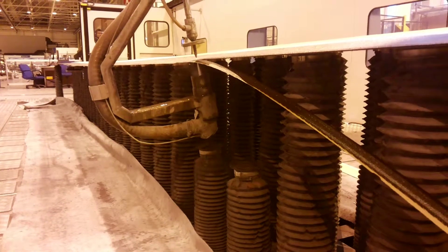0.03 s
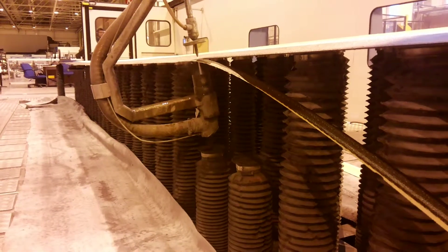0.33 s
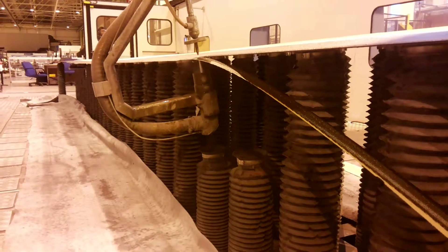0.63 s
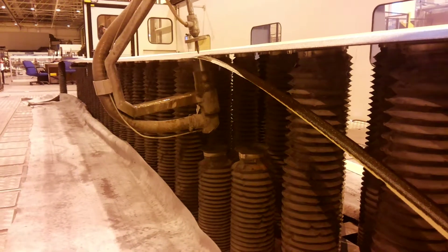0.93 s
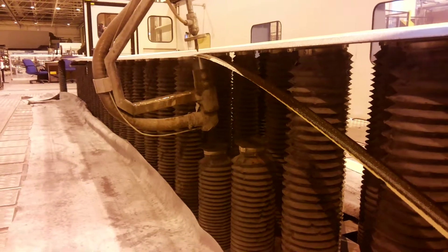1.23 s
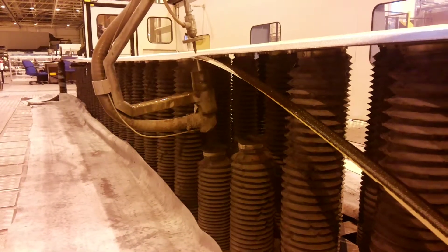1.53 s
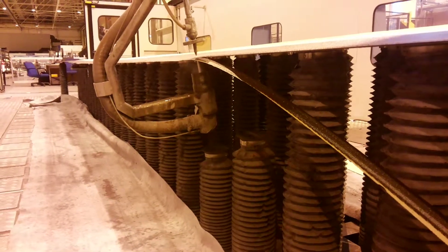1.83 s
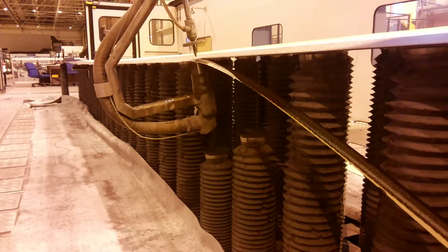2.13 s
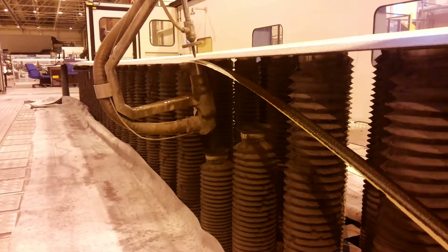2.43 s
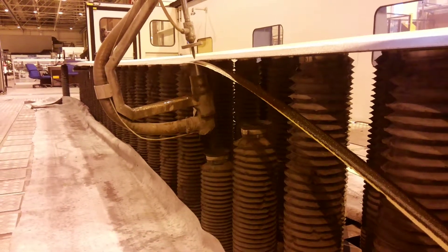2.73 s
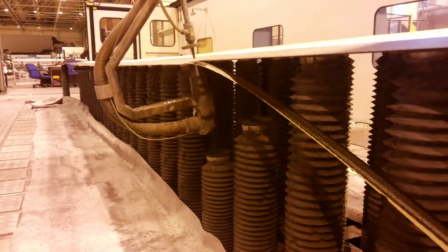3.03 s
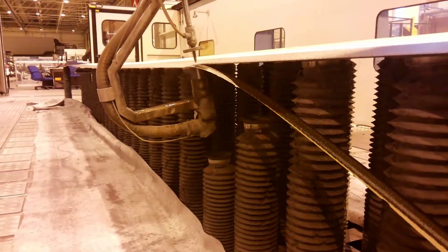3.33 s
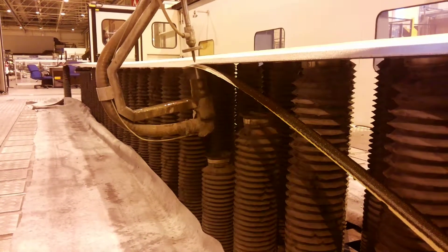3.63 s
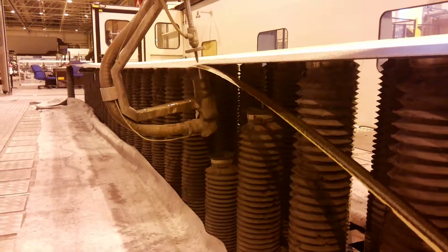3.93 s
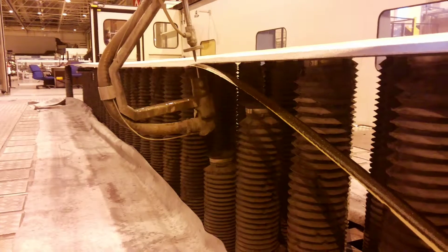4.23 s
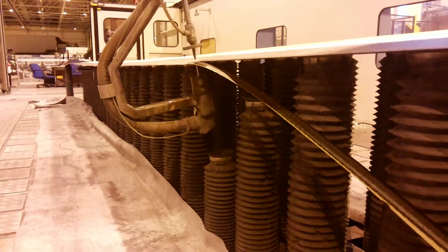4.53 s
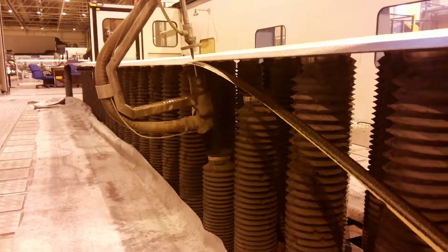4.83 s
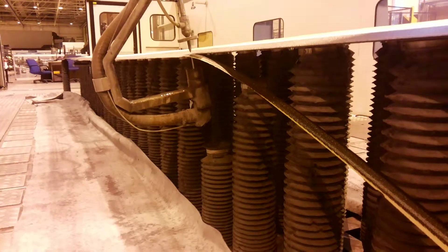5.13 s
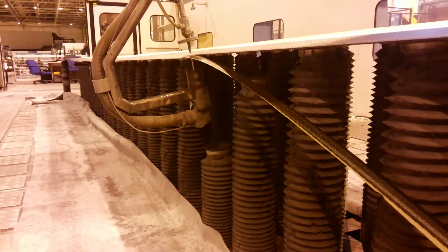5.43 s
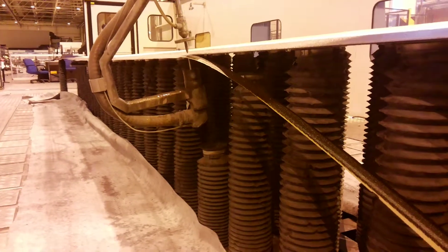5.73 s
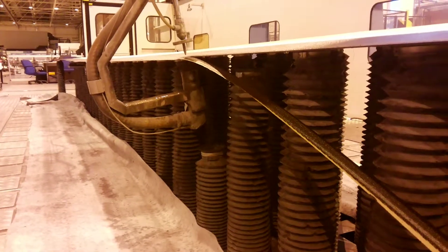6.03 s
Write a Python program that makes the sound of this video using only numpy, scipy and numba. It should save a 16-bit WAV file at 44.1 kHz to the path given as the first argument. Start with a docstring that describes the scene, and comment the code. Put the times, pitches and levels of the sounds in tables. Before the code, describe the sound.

A vacuum fixture sucks air through a narrow gap, hissing loudly and singing in rough, wavering tones. After about four seconds the leak widens into a hollow hose roar that slightly distorts the close mono microphone. Some two seconds later the rush stops abruptly as the seal closes. A faint, nearly pure whistle remains over the brief echo of the workshop hall and a soft wash of machines.

```python
"""Leaking vacuum fixture

Air rushes through a seal and a hose in a machine hall, close up, mono. The narrow gap hisses and sings
in rough edge tones; at 4 s it opens and the hose roars; just before 6 s it shuts, leaving a thin whistle,
the hall's echo and machinery. The rush drives the recorder's gain down and overloads it."""
import sys
import numpy as np
from scipy import signal
from scipy.fft import rfft, irfft
from scipy.io import wavfile
from scipy.ndimage import uniform_filter1d
from numba import njit

SR = 44100
rng = np.random.default_rng(int(sys.argv[2]) if len(sys.argv) > 2 else 0)


def digitize_waveform(pressure):
    """Quantize a signal to 16-bit integers and store it at the path in sys.argv[1].

    Rows of a 2-D input are taken as channels; values are limited to [-1, 1].
    """
    field = np.atleast_2d(pressure).T
    bounded = np.clip(field, -1, 1)
    quanta = np.round(bounded * 32767).astype(np.int16)
    wavfile.write(sys.argv[1], SR, quanta)


N = 277830
TIME_S, FREQ_HZ = np.arange(N) / SR, np.maximum(np.fft.rfftfreq(N, 1 / SR), 1)

# spectra of gap turbulence, hose turbulence, machinery wash (frequency [Hz], relative density [dB])
GAP_SPECTRUM = [(60, -55), (150, -60), (300, -9), (850, -3.5), (1100, -2.5), (2300, -11), (2800, -8),
                (3600, -2.5), (4500, -5), (6300, 0.5), (7000, 5), (8200, 3), (8800, -1.5), (15500, -4.5)]
HOSE_SPECTRUM = [(80, -53), (200, -63), (500, -11.5), (870, -7.5), (1100, -7.5), (1700, -2.5), (2400, -4.5),
                 (3100, -8), (4500, -5), (5400, -2), (6150, -27), (7200, -22), (9000, -18.5), (15500, -7.5)]
MACHINERY_SPECTRUM = [(60, -6), (120, -25), (180, -26), (220, -10), (400, -7.5), (900, -6.5), (1100, -4.5),
                      (2450, 3), (2850, -10.5), (4400, -3), (6300, -13.5), (7800, -12), (8700, -16.5),
                      (15500, -21)]
# resonances of gap cavity and hose (frequency [Hz], width [Hz], relative level [dB])
GAP_RESONANCES = [(1027, 63, -8), (1143, 46, 0), (1266, 31, 3), (1403, 48, -7), (1528, 63, -4.5),
                  (1744, 71, -3), (1938, 35, 1), (2167, 40, -3), (2299, 35, -7.5), (2600, 39, -9),
                  (2720, 96, -5), (3077, 110, -5.5), (3295, 96, -7), (3895, 100, -7.5), (4098, 60, -2.5),
                  (4394, 75, -5.5), (4644, 48, -2.5), (5500, 45, 0), (5957, 38, -1.5), (9520, 250, -11.5),
                  (10560, 460, -12), (11940, 280, -10), (13400, 460, -7.5)]
HOSE_RESONANCES = [(1024, 45, -7.5), (1153, 41, 0), (1292, 47, -4), (1400, 71, -4.5), (1529, 39, -2),
                   (1669, 50, -2), (1812, 53, -8.5), (1880, 34, -1.5), (1958, 73, 3), (2272, 86, 0.5),
                   (2450, 70, 2), (2698, 51, -3.5), (2820, 26, -3.5), (2977, 47, -6.5), (3150, 36, -15),
                   (3416, 42, -12), (3636, 53, -13), (4080, 62, -14.5), (4383, 31, -8), (5500, 120, -10.5),
                   (6760, 150, -12.5), (7420, 90, -13), (10580, 400, -16), (12130, 560, -15.5),
                   (13600, 410, -34)]
# tones of pockets behind the seal (frequency [Hz], width [Hz], best opening [0..1], relative level [dB])
POCKET_TONES = [(8170, 320, 0, -24.5), (2134, 53, 0, -26.5), (7070, 100, 0.041, -25.5),
                (5060, 100, 0.18, -26.5), (7940, 200, 0.29, -20.5), (5120, 140, 0.43, -24),
                (2280, 37, 0.44, -25.5), (1906, 45, .48, -27.5), (6695, 100, 0.46, -24),
                (1163, 114, 0.99, -19.5), (5440, 240, 0.92, -25), (6970, 140, 0.91, -20.5),
                (7350, 150, 0.93, -18), (8040, 270, 1, -24.5)]
# extra air through the hose (time [s], length [s], level [dB])
HOSE_GULPS = [(0.553, 0.24, -16), (1.6, 0.18, -21)]
# blower and motor lines (frequency [Hz], level re machinery wash [dB])
BLOWER_LINES = [(226, -32.5), (444, -31), (1319, -22.5), (2961, -18)]

GIVE_WAY_AT_S, GIVE_WAY_OVER_S = 4.06, 0.17
SHUT_AT_S, SHUT_OVER_S = 5.962, 0.045


def gap_hiss(wide, shut, slit_db=-11.5, wide_db=-0.5, pinch_db=-16, shut_db=-11, pinch_s=0.44):
    """Turbulence rings the gap's cavity; pinched off just before the seal shuts."""
    pinch = ramp(SHUT_AT_S - pinch_s / 2, pinch_s)
    flow = undb(slit_db + wide_db * wide + pinch_db * pinch ** 2 + shut_db * shut)
    return flow * airflow(GAP_SPECTRUM, GAP_RESONANCES, ring_db=8.5, flutter_db=1.8)


def hose_roar(opening, shut, wide_db=-5.5, slit_db=-27, shut_db=-26.5):
    """The wider the gap, the more air the hose draws; now and then it gulps."""
    draw = undb(wide_db + slit_db * (1 - opening) + shut_db * shut)
    gulps = sum(undb(db) * np.exp(-(2 * (TIME_S - at_s) / length_s) ** 2)
                for at_s, length_s, db in HOSE_GULPS)
    flow = np.hypot(draw, gulps)
    return flow * airflow(HOSE_SPECTRUM, HOSE_RESONANCES, ring_db=9.5, flutter_db=2.0)


def edge_tones(opening, shut, level_db=-1, flutter_db=2.5, opening_spread=0.25):
    """The jet locks on to the seal's lip in rough whistles, each near its own opening."""
    tones = 0
    for hz, width_hz, best_opening, db in POCKET_TONES:
        lock = np.exp(-0.5 * ((opening - best_opening) / opening_spread) ** 2)
        tones += lock * noise(resonance(hz, width_hz)) * undb(db + flutter_db * wander(16))
    return tones * undb(level_db) * (1 - shut)


def seal_whistle(hz=2692, drift_hz=3, level_db=-24.5, waver_db=1, rise_s=0.05):
    """The last air squeezes past the shut seal on one nearly pure note."""
    tone = sine(hz + drift_hz * wander(20.4))
    return tone * ramp(SHUT_AT_S, rise_s) * undb(level_db + waver_db * wander(9.4))


def hall_echo(air, level_db=-4.5, t60_s=0.95, cutoff_hz=5860):
    """Dense reflections from far walls, which absorb treble."""
    tail = rng.standard_normal(N) * undb(-60 * TIME_S / t60_s)
    tail = lowpass(tail / np.linalg.norm(tail), cutoff_hz, order=4)[:SR]
    lead_in = air[SR - 1:0:-1]  # hall already ringing at 0 s
    return undb(level_db) * signal.fftconvolve(np.concatenate([lead_in, air]), tail, "valid")


def machinery(level_db=-20, waver_db=4.5, drift_hz=3.15):
    """Distant machines merge into a wash; the blower's lines waver in it."""
    wash = noise(spectrum_gain(MACHINERY_SPECTRUM))
    for hz, db in BLOWER_LINES:
        wash += sine(hz + drift_hz * wander(5.8)) * undb(db + waver_db * wander(20))
    return wash * undb(level_db)


def pump_rumble(level_db=-58, labour_db=6, waver_db=6):
    """Faint, uneven bass; the pump labours once the seal is shut."""
    envelope = undb(level_db + labour_db * ramp(SHUT_AT_S, SHUT_OVER_S) + waver_db * wander(8.5))
    return envelope * noise(resonance(hz=114, width_hz=38) + 0.05)


def airflow(spectrum, resonances, ring_db, flutter_db):
    """Turbulence plus the resonances it drives, each fluttering on its own; rms 1."""
    broadband = spectrum_gain(spectrum)
    air = noise(broadband)
    for hz, width_hz, db in resonances:
        band = resonance(hz, width_hz)
        share = np.sqrt(np.sum(band ** 2) / np.sum(broadband ** 2))
        air += share * noise(band) * undb(ring_db + db + flutter_db * wander(2.9))
    return air / np.std(air)


def undb(db):
    """Decibels to gain."""
    return 10 ** (np.asarray(db) / 20)


def ramp(centre_s, over_s):
    """Linear rise, 0 to 1."""
    return np.clip((TIME_S - centre_s) / over_s + 0.5, 0, 1)


def spectrum_gain(spectrum):
    """Gain per bin, interpolated over log frequency."""
    hz, db = np.transpose(spectrum)
    return undb(np.interp(np.log(FREQ_HZ), np.log(hz), db))


def resonance(hz, width_hz):
    """Steep-sided band, gain 1 at centre."""
    return 1 / (1 + ((FREQ_HZ ** 2 - hz ** 2) / (FREQ_HZ * width_hz * np.pi / 2)) ** 2)


def noise(bin_gain):
    """Shaped noise, rms 1."""
    shaped = irfft(rfft(rng.standard_normal(N)) * bin_gain, N)
    return shaped / np.std(shaped)


def wander(rate_hz):
    """Slow random motion, rms 1."""
    return noise(1 / (1 + (FREQ_HZ / rate_hz) ** 2))


def sine(hz):
    """Tone of varying pitch, rms 1."""
    return np.sqrt(2) * np.sin(2 * np.pi * np.cumsum(hz) / SR)


def lowpass(x, cutoff_hz, order):
    """Zero-phase treble cut."""
    return irfft(rfft(x) / (1 + (FREQ_HZ / cutoff_hz) ** order), N)


def presence(x, db, hz=5600, width_hz=3500):
    """Broad upper-midrange lift or cut."""
    return irfft(rfft(x) * undb(db * resonance(hz, width_hz)), N)


def bass_flicker(x, cutoff_hz=152, mean_db=-7.5, flicker_db=3):
    """The lowest notes are cut, and dip and swell irregularly."""
    bass_gain = undb(mean_db + flicker_db * wander(9.1))
    return x + lowpass(x, cutoff_hz, order=10) * (bass_gain - 1)


@njit
def follow_power(power, held, attack_s, release_s):
    """Level detector with separate rise and fall times."""
    envelope = np.empty(len(power))
    for i in range(len(power)):
        lag_s = attack_s if power[i] > held else release_s
        held += (power[i] - held) / (lag_s * SR)
        envelope[i] = held
    return envelope


def auto_gain(x, target_db=-9.5, max_db=2, attack_s=0.029, release_s=0.061):
    """Gain drops under the roar and recovers after it."""
    power = uniform_filter1d(np.mean(x ** 2, axis=0), size=SR // 100)
    envelope = follow_power(power, np.mean(power[:SR // 10]), attack_s, release_s)
    return np.minimum(undb(target_db) / np.sqrt(envelope), undb(max_db))


def scene(creep_per_s=0.12, flutter_db=0.48):
    """The seal creeps open under suction, gives way and snaps shut; the hall answers."""
    wide = ramp(GIVE_WAY_AT_S, GIVE_WAY_OVER_S)
    shut = ramp(SHUT_AT_S, SHUT_OVER_S)
    creep = creep_per_s * TIME_S
    opening = creep + (1 - creep) * wide  # 0 = slit, 1 = wide
    air = gap_hiss(wide, shut) + hose_roar(opening, shut) + edge_tones(opening, shut)
    air *= undb(flutter_db * wander(23))
    mono = air + hall_echo(air) + machinery() + seal_whistle()
    return np.array([mono, mono])


def record(dry, drive_db=1, ceiling=0.54, lift_db=3, low_cut_hz=130, high_cut_hz=15760):
    """Auto gain, overload (lifted upper mids first), bass cut, added pump rumble, top cut."""
    gain = auto_gain(dry)
    driven = presence(dry * gain, lift_db) * undb(drive_db) / ceiling
    clipped = ceiling * driven / (1 + driven ** 12) ** (1 / 12)
    evened = presence(clipped, -0.7 * lift_db)
    thinned = signal.sosfilt(signal.butter(8, low_cut_hz, "high", fs=SR, output="sos"), evened)
    mix = bass_flicker(thinned) + gain * pump_rumble()
    high_cut = signal.firwin(601, high_cut_hz, fs=SR)  # linear phase keeps clipped peaks flat
    return signal.fftconvolve(mix, high_cut[None], "same", axes=1)


dry = scene()
out = record(dry)
digitize_waveform(out)
```